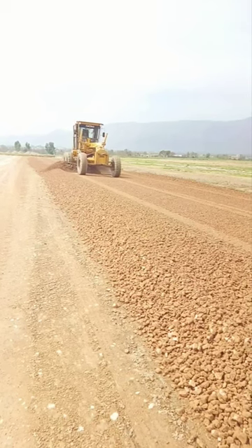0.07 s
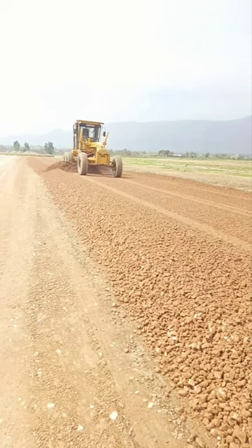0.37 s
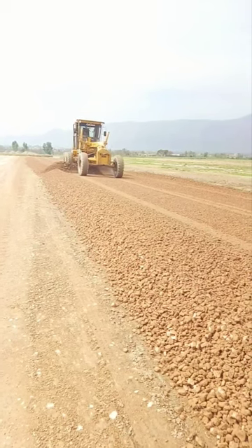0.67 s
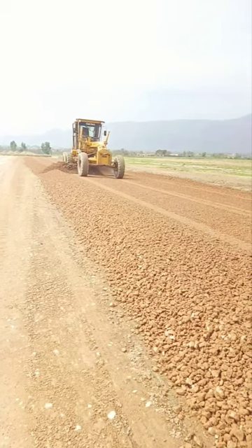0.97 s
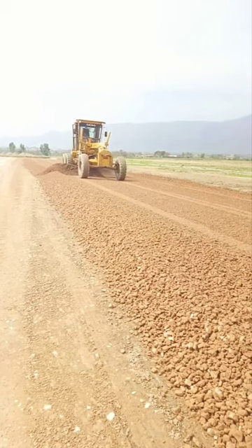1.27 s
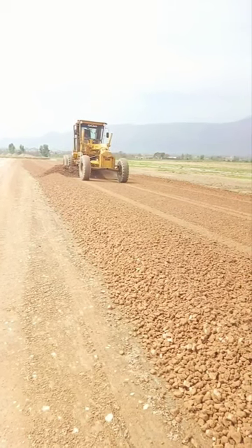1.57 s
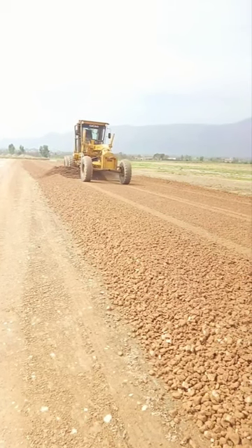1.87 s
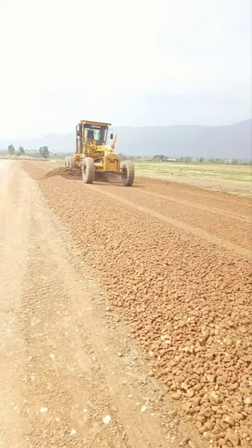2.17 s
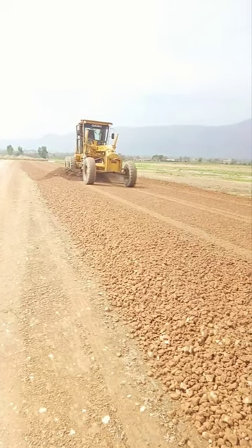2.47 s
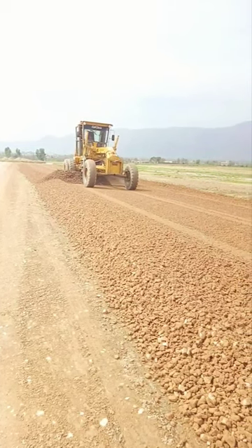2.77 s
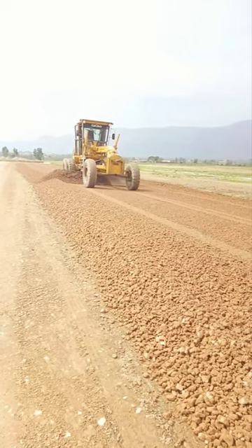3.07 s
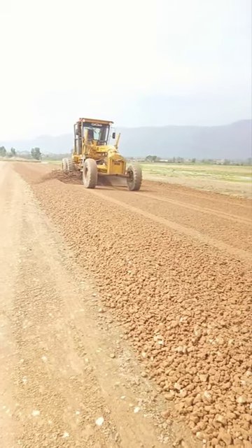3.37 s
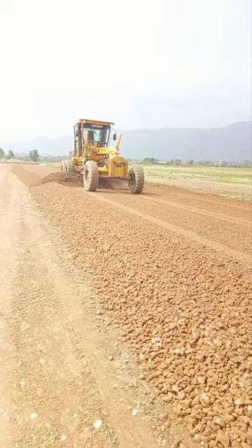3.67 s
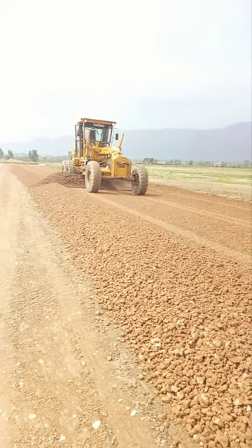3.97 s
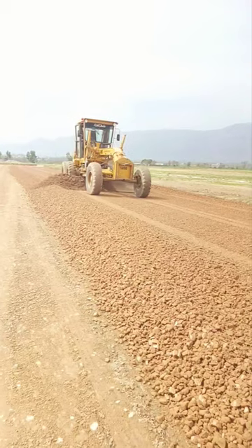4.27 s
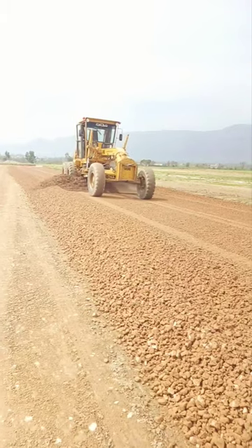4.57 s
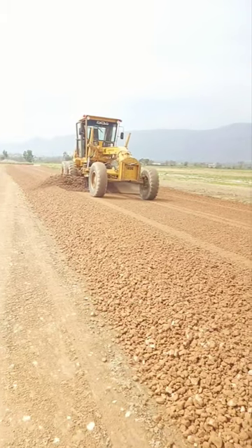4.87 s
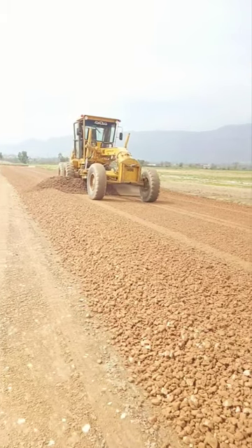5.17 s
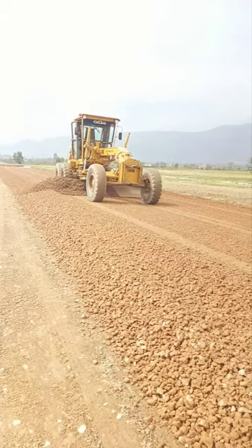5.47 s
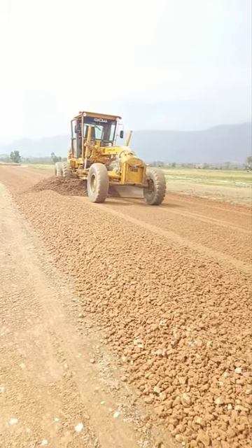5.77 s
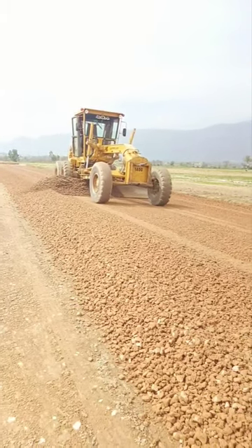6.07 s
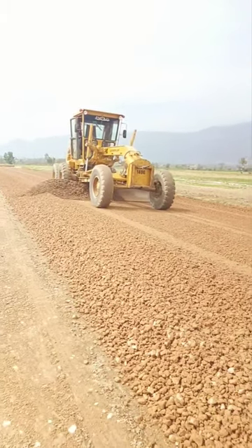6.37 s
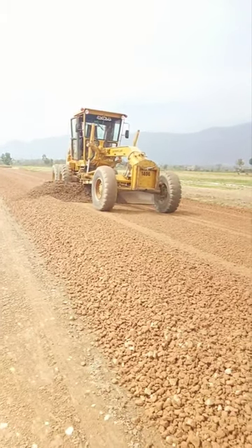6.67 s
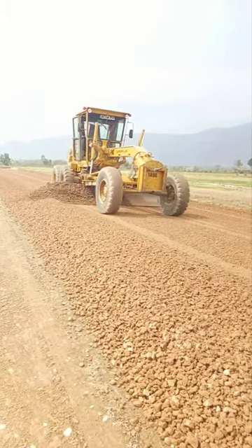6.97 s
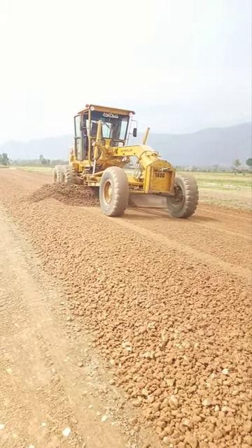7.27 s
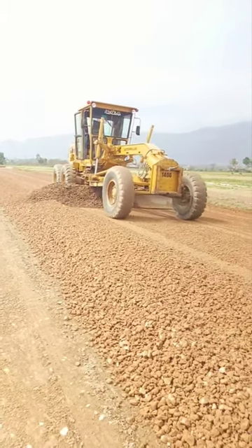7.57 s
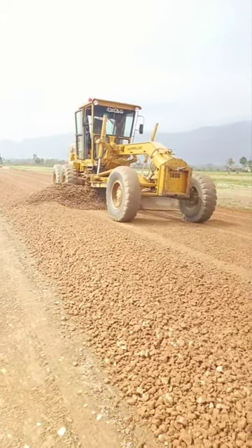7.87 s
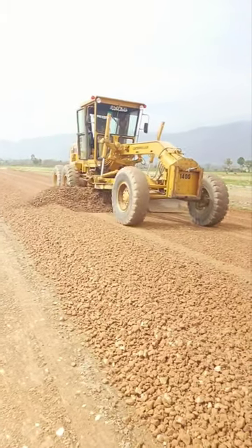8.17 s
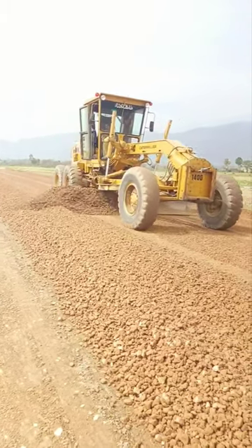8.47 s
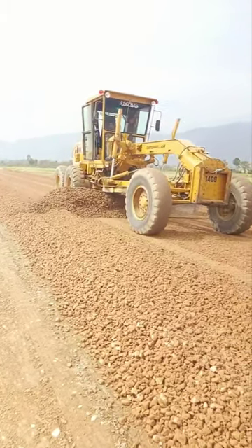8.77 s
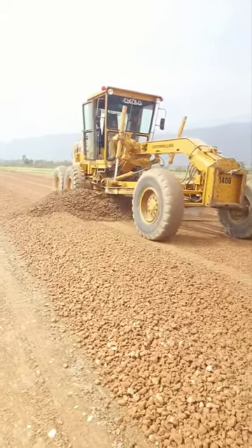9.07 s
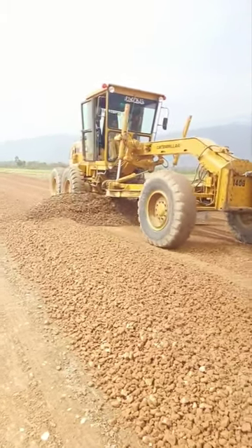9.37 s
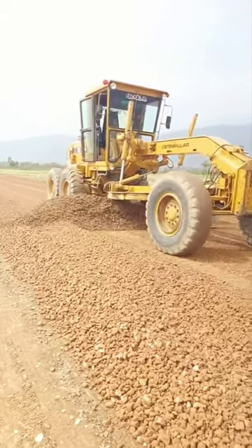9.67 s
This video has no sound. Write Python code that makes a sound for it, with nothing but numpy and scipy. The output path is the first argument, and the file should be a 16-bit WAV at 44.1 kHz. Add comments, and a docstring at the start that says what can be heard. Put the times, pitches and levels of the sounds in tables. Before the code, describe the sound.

Outdoors, gusts of wind rumble on the microphone while a hydraulic valve hisses briefly and shuts. A grader's diesel engine throbs and rattles at an even pace, slowly getting louder as the machine approaches. Its blade pushes a ridge of gravel that hisses, ticks and scrapes, with dull thuds from larger stones later on. Close by, the gear whine stands out above the tyres rumbling over loose ground.

```python
"""On a gravel road in open country, a motor grader creeps closer, its six-cylinder diesel at a steady speed.
The exhaust drones, pistons and firings rattle the engine block, and meshing gears whine.
The blade rolls a ridge of stones that hiss, scrape and thud, while the tyres rumble over loose gravel.
Oil hisses through a hydraulic valve at first, and gusts of wind buffet the microphone."""
import sys
import numpy as np
from scipy import signal
from scipy.fft import rfft, irfft, next_fast_len
from scipy.io import wavfile

SR = 44100
rng = np.random.default_rng(int(sys.argv[2]) if len(sys.argv) > 2 else 0)


def bounce(signal):
    """Save signal as a 16-bit WAV file at the path given by the first command-line argument."""
    frames = np.transpose(np.atleast_2d(signal))
    limited = np.clip(frames, -1, 1)
    pcm = np.round(limited * 32767).astype(np.int16)
    wavfile.write(sys.argv[1], SR, pcm)


N = 433062
T = np.arange(N) / SR
NEAR_M, FAR_M = 10.4, 24  # distances that count as fully near and fully far


def from_db(db):
    """Turn decibels into a factor to multiply a sound by."""
    return 10 ** (np.asarray(db) / 20)


def rms_one(x):
    """Scale a sound so that its average strength (rms) is 1."""
    return x / np.sqrt(np.mean(x ** 2) + 1e-20)


def in_time(rows):
    """Join (time, value) points with straight lines, giving a value for every sample."""
    return np.interp(T, *np.transpose(rows))


def bump(s, half):
    """A smooth rise to 1 and fall around the moment s."""
    return np.exp(-((T - s) / half) ** 2)


def drift(rate_hz):
    """A random wobble of size about 1; a higher rate wobbles faster."""
    step, warm_up = 40, 2000
    r = np.exp(-2 * np.pi * step * rate_hz / SR)
    noise = rng.standard_normal(N // step + warm_up + 2)
    slow = signal.lfilter([1], [1, -2 * r, r * r], noise)[warm_up:]
    return np.interp(np.arange(N) / step, np.arange(len(slow)), rms_one(slow))


def colour(x, spectrum, skirt_db=60):
    """Shape a sound's lows and highs by a spectrum, losing skirt_db per octave beyond its ends."""
    size = next_fast_len(N)
    hz, db = np.transpose(spectrum)
    octave = np.log2(np.maximum(np.arange(size // 2 + 1) * SR / size, 1))
    points = np.log2(hz)
    outside = np.abs(octave - np.clip(octave, points[0], points[-1]))
    gain = from_db(np.interp(octave, points, db) - skirt_db * outside)
    return rms_one(irfft(rfft(x, size) * gain, size)[:N])


def nearing(x, far, near, nearness):
    """Blend from a sound's distant colour (nearness 0) to its close one (nearness 1)."""
    return (1 - nearness) * colour(x, far) + nearness * colour(x, near)


def resonate(x, hz, width):
    """Make a sound ring at one pitch; a narrower width rings longer."""
    r = np.exp(-np.pi * width / SR)
    feedback = [1, -2 * r * np.cos(2 * np.pi * hz / SR), r * r]
    return signal.lfilter(np.array([1, 0, -1]) * (1 - r * r) / 2, feedback, x)


def ringing(x, modes):
    """Ring at several pitches (modes) at once, added with alternating signs."""
    rings = ((-1) ** k * from_db(db) * resonate(x, hz, width) for k, (hz, width, db) in enumerate(modes))
    return rms_one(sum(rings))


def grains(per_s, spread_db, length_s):
    """Tiny hits at random moments, each a dying burst of noise, a few much larger than the rest."""
    sizes = from_db(spread_db * np.minimum(rng.exponential(1, N), 5))
    hits = rng.random(N) < per_s / SR
    power = signal.lfilter([1], [1, -np.exp(-2 / (length_s * SR))], hits * sizes ** 2 + 1e-12)
    return rms_one(np.sqrt(power) * rng.standard_normal(N))


def tone(turns, flutter):
    """A pure tone, one wave per turn, that flutters in the moving air."""
    angle = 2 * np.pi * (turns + rng.random())
    wave = (1 + flutter * drift(2.0)) * np.sin(angle) + flutter * drift(2.03) * np.cos(angle)
    return np.sqrt(2) * wave / np.sqrt(1 + 2 * flutter ** 2)


def doublings(start_m=30, roll_m_per_s=1.9):
    """How many times the approaching grader's distance doubles beyond NEAR_M."""
    return np.log2((start_m - roll_m_per_s * T) / NEAR_M)


def closeness():
    """0 far away, 1 close by."""
    return np.clip(1 - doublings() / np.log2(FAR_M / NEAR_M), 0, 1)


def swell(start_s=1.87, length_s=0.47):
    """Goes from 0 to 1 early on, as the machine grows louder and stays so."""
    return np.clip((T - start_s) / length_s, 0, 1)


def level_of(part):
    """Level in dB of one part of the machine as it comes closer."""
    # part: (level at NEAR_M [dB], loss per doubling of distance [dB], cut before the swell [dB])
    part_levels = {"block": (-36.5, 6, 2.5), "injectors": (-43, 7.5, 2.5), "blade": (-32.5, 10.5, 3),
                   "gravel": (-48, 8.5, 3), "grit": (-61, 5, 4.5), "tyres": (-42, 3, 3),
                   "wheel rumble": (-38.5, 7, -1.5)}
    near_db, loss_db, cut_db = part_levels[part]
    return near_db - loss_db * doublings() - cut_db * (1 - swell())


def exhaust(cycle):
    """The silencer lets the lowest firing tones through; unequal cylinders make them throb."""
    # exhaust tones: (waves per engine cycle [count], relative level [dB])
    orders = {6: 0, 12: -14, 18: -16.5, 21: -28.5, 24: -32.5, 26: -27.5}
    # uneven firing: (time [s], throb depth [0-1])
    throb_depths = [(.65, 0.28), (.9, 0.8), (1.7, 0.3), (1.9, 0.2), (5, 0.44), (9.8, 0.4)]
    # the drone, loudest under load at first, then wavering in the moving air: (time [s], level [dB])
    drone_levels = [(0, -24.5), (.4, -25.5), (.75, -28.5), (.87, -33), (1.02, -31.3), (1.15, -34),
                    (1.72, -33.3), (1.87, -29.8), (3.95, -29.8), (4.2, -32.5), (4.47, -30.8), (4.68, -36),
                    (4.85, -32), (5.08, -35.3), (5.3, -31.5), (5.6, -30.3), (6, -32), (6.15, -29.9),
                    (7.4, -31), (8.5, -30.2), (8.8, -31), (9.35, -29), (9.82, -31.7)]
    drone = sum(from_db(db) * tone(order * cycle, flutter=.1) for order, db in orders.items())
    depth = in_time(throb_depths)
    throb = 1 + depth * np.sin(2 * np.pi * (cycle + 0.41 * drift(3.08)))
    throb /= np.sqrt(1 + depth ** 2 / 2)
    waver_db = .6 * drift(6)
    return from_db(in_time(drone_levels) + waver_db) * rms_one(drone * throb)


def rattle(cycle, repeat, uneven_db, slots=24, size=4096):
    """Metal parts tap unevenly; the share 'repeat' comes round every engine cycle, the rest is random."""
    position = cycle % 1
    one_cycle = irfft(np.exp(2j * np.pi * rng.random(size // 2 + 1)))
    repeating = rms_one(np.interp(position * size, np.arange(size), one_cycle))
    loose = grains(per_s=1700, spread_db=1.5, length_s=0.0072)
    taps = np.sqrt(repeat) * repeating + np.sqrt(1 - repeat) * loose
    strengths = from_db(uneven_db * rng.permutation(np.linspace(-1, 1, slots)))
    return taps * strengths[(position * slots).astype(int)]


def knocks(cycle, uneven_db=4, chance_db=3.5, cylinders=6):
    """Each firing strikes the engine block and makes it ring, some cylinders harder than others."""
    # ringing of the block: (pitch [Hz], width [Hz], relative level [dB])
    block_modes = [(638, 25, -1.5), (679, 17, -3), (974, 28, 1), (1003, 24, 1), (1425, 48, -13.5),
                   (1886, 50, -17), (2620, 70, -20), (2768, 35, -8)]
    firing = (cycle * cylinders).astype(int)
    at = np.flatnonzero(np.diff(firing))
    cylinder_db = uneven_db * rng.permutation(np.linspace(-1, 1, cylinders))[firing[at] % cylinders]
    out = 0
    for hz, width, db in block_modes:
        blows = np.zeros(N)
        blows[at] = from_db(cylinder_db + chance_db * rng.standard_normal(len(at)))
        blows[at] *= rng.choice([-1, 1], len(at))
        out = out + from_db(db) * rms_one(resonate(blows + 1e-18, hz, width))
    return rms_one(out)


def clatter(cycle, swell_share=0.66, shimmer_db=0.75, panels_db=-6, knocks_db=-7):
    """Pistons and valves rattle the block and shake the panels; moving air makes the sound shimmer."""
    # the block from afar, the block close by, and the panels: (frequency [Hz], relative level [dB])
    block_far = [(780, -7), (900, 1.5), (965, -6.5), (1010, 10.5), (1060, 1), (1190, -2.5), (1330, 0),
                 (1430, 0), (1500, 5.5), (1600, -64)]
    block_near = [(780, -7), (850, -10), (910, 2), (980, -8.5), (1090, -4), (1170, -10.5), (1380, -8.5),
                  (1490, -10.5), (1600, -25.5)]
    panel_spectrum = [(480, -10), (560, -5.5), (625, 0.5), (690, 3.5), (760, -12)]
    nearness = swell_share * swell() + (1 - swell_share) * closeness()
    block = nearing(rattle(cycle, repeat=.36, uneven_db=2.3), block_far, block_near, nearness)
    panels = from_db(panels_db) * colour(rattle(cycle, repeat=0.52, uneven_db=3.5), panel_spectrum)
    return from_db(shimmer_db * drift(5.0)) * (block + panels + from_db(knocks_db) * knocks(cycle))


def gears(cycle):
    """Timing gears and the fuel pump hum in step with the engine, clearest midway through."""
    # gear and pump tones: (waves per engine cycle [count], relative level [dB])
    orders = {36: -17, 42.5: -17, 54: -10.5, 55: -15, 59: -18, 72: -17, 77: -17, 84: -13, 85: -12.5, 87:
              -14, 90: -15.5, 93: -19.5, 96: -19.5, 116: -20, 123: -19.5, 127.3: -20, 147: -25, 240: -23.5}
    # how well they stand out of the clatter: (time [s], boost [dB])
    clarity = [(0, -5), (1.8, -5), (2.6, 1), (7, 1.5), (8.5, -2.5)]
    tones = sum(from_db(db) * tone(order * cycle, flutter=0.9) for order, db in orders.items())
    return from_db(in_time(clarity)) * tones


def injectors(cycle):
    """The fuel injectors tick, giving the diesel knock its bright edge."""
    # injector ticking: (frequency [Hz], relative level [dB])
    spectrum = [(1600, 4), (1670, 1), (1765, 6), (1870, 6.5), (2000, 1.5), (2180, 1), (2400, -2.5),
                (2510, 4), (2640, 6), (2780, 6), (2950, 3), (3130, -7.5)]
    return from_db(level_of("injectors")) * colour(rattle(cycle, repeat=0.12, uneven_db=-1.0), spectrum)


def stone_ridge(slump_db=0.46, steel_db=-1.5):
    """Rolling stones drum on the blade, ring its steel and rub together; sand trickles between them."""
    # drumming on the blade, then gravel and sand, far and near: (frequency [Hz], relative level [dB])
    drum_spectrum = [(190, -7.5), (330, -13.5), (442, -6.5), (535, 0.5), (577, -2.5), (692, -3),
                     (779, -11.5), (850, -10), (1100, -56), (1870, -120)]
    gravel_far = [(1820, -24), (3100, -4.5), (3210, -13), (3430, 3.5), (3820, 1.5), (4140, 1.5),
                  (4850, -11), (5200, -5), (5830, -11.5), (6770, -3), (7410, -1), (7730, -3.5), (8280, -21),
                  (8600, -25), (11200, -45), (18900, -120)]
    gravel_near = [(1760, -51), (3000, -18), (3250, 3), (3710, -1), (4060, 2), (5000, -10), (5580, -4),
                   (5980, -14), (6400, -6.5), (7320, -10), (8320, -19), (9000, -11), (11700, -49),
                   (19800, -120)]
    sand_far = [(4820, -41), (8200, -6), (9400, -4), (10400, -6), (11300, -3.5), (14400, -8),
                (15800, -13.5)]
    sand_near = [(4820, -41), (8200, -6), (8500, -23), (9330, -18), (10200, -10), (11100, 2), (12600, 1),
                 (15200, -3), (15800, -12)]
    # ringing of the steel blade: (pitch [Hz], width [Hz], relative level [dB])
    blade_modes = [(1730, 38, 13), (2227, 43, 9), (2810, 64, 2), (3490, 130, -2.5), (4130, 130, 1),
                   (4570, 130, -5), (5120, 150, -9.5), (5580, 170, -4.5), (6350, 290, -5.5),
                   (7130, 240, -11), (9530, 240, -14)]
    tumbling = grains(per_s=1200, spread_db=1.9, length_s=.004)
    rubbing = grains(per_s=1900, spread_db=2.0, length_s=0.0092)
    sliding = grains(per_s=230, spread_db=3.0, length_s=0.014)
    trickling = grains(per_s=8400, spread_db=1.5, length_s=0.0016)
    drum = from_db(level_of("blade")) * colour(tumbling, drum_spectrum)
    crunch = from_db(level_of("gravel")) * nearing(rubbing, gravel_far, gravel_near, closeness())
    steel = from_db(level_of("gravel") + steel_db) * ringing(sliding, blade_modes)
    sand = from_db(level_of("grit")) * nearing(trickling, sand_far, sand_near, closeness())
    return (drum + crunch + steel + sand) * from_db(slump_db * drift(4.4))


def pebbles(per_s=130, spill_db=5.5, range_hz=(3400, 11500), pitches=12, sharpness=14):
    """Pebbles spill off the ridge in little runs and tick at different pitches, louder close by."""
    near_db, loss_per_doubling_db = -58, 11
    rate = per_s * from_db(spill_db * np.tanh(drift(5)))
    ticks = 0
    for hz in np.geomspace(*range_hz, pitches):
        hits = (rng.random(N) < rate / (pitches * SR)) * rng.uniform(.2, 1, N)
        ring = resonate(resonate(hits + 1e-18, hz, hz / sharpness), hz, hz / 2)
        ticks = ticks + rms_one(ring) / hz ** 1.5  # higher ticks are quieter
    return from_db(near_db - loss_per_doubling_db * doublings()) * rms_one(ticks)


def tyres():
    """Stones shift dully under the heavy wheels and the ground rumbles, more so over each heap."""
    # shifting gravel and rumbling ground: (frequency [Hz], relative level [dB])
    gravel_spectrum = [(150, -18), (210, -0.5), (290, 4), (340, -2.5), (400, -17.5)]
    rumble_spectrum = [(85, -8), (102, -4.5), (140, -12.5), (190, -11.5)]
    # heaps (louder) and smooth ground (quieter): (time [s], change [dB], half length [s])
    heaves = [(4.68, -9, .12), (5.123, -9, 0.085), (5.88, 6, 0.11), (6.6, 3, 0.17), (7.07, 6, .06),
              (7.23, 6.5, .06), (8.008, 6, 0.061), (8.25, 2, 0.082), (8.5, 4, 0.051), (8.88, 2, .08),
              (9.264, 8, 0.066)]
    contacts = grains(per_s=400, spread_db=4.5, length_s=0.0048)
    shifting = from_db(level_of("tyres")) * colour(contacts, gravel_spectrum)
    rumble = from_db(level_of("wheel rumble")) * colour(rng.standard_normal(N), rumble_spectrum)
    return (shifting + rumble) * from_db(sum(db * bump(s, half) for s, db, half in heaves))


def hydraulics(release_s, shuts_s=.79):
    """How hard the hydraulics work: at most 1, falling to 0 as the valve shuts."""
    return np.clip((shuts_s - T) / release_s, 0, 1)


def valve(start_db=-50.5, fade_db_per_s=7.5):
    """Oil hisses through a valve and its pipes until the valve snaps shut."""
    # ringing of the pipes: (pitch [Hz], width [Hz], relative level [dB])
    pipe_modes = [(1854, 39, 10.5), (2920, 200, 1), (3600, 220, -3), (4560, 200, -1.5), (5500, 260, -5),
                  (6560, 330, -6.5), (9300, 530, -19)]
    flow = from_db(start_db - fade_db_per_s * T) * hydraulics(release_s=0.011)
    return flow * ringing(rng.standard_normal(N), pipe_modes)


def wind(breeze_db=-35.5, fade_db_per_s=0.46, lumpy_db=6.5):
    """Swirls of air hit the microphone, harder in gusts; sharp puffs carry smaller, higher ones."""
    # gusts and sharp puffs: (time [s], level [dB], half length [s])
    gust_events = [(.16, -28.5, 0.14), (.36, -27.5, .12), (.57, -25.5, 0.13), (.74, -27.5, 0.06),
                   (1.9, -35.5, 0.08), (2.26, -31.5, .09), (2.44, -28.5, .12), (2.8, -32, 0.13),
                   (3.2, -34.5, 0.15), (3.58, -34.5, .1), (3.87, -34, 0.12), (4.28, -29, 0.087),
                   (4.5, -36, .05), (4.87, -38, .06), (5.34, -32.5, .12), (5.64, -28, 0.09),
                   (5.76, -30, .04), (5.93, -33.5, .1), (6.16, -32.5, 0.08), (6.57, -32, 0.17),
                   (7.2, -37, 0.1)]
    puff_events = [(0.474, -35, 0.015), (0.575, -33, 0.023), (0.73, -45, 0.052), (5.27, -32, 0.018),
                   (5.36, -28.5, 0.032), (5.628, -36, 0.046)]
    # deep wind rumble and the higher puffs: (frequency [Hz], relative level [dB])
    wind_spectrum = [(15, -11), (32, -10), (52, -2), (85, 1), (115, 2), (140, -0.5), (190, -5), (240, -9),
                     (290, -11), (350, -19.5), (450, -33), (900, -60)]
    puff_spectrum = [(150, 6), (250, 7), (350, -0.5), (480, -5.5)]
    swirls = rng.standard_normal(N) * from_db(lumpy_db * np.tanh(drift(42)))
    breeze = from_db(breeze_db - fade_db_per_s * T)
    gusts = sum(from_db(db) * bump(s, half) for s, db, half in gust_events)
    puffs = sum(from_db(db) * bump(s, half) for s, db, half in puff_events)
    rumble = np.hypot(breeze, gusts) * colour(swirls, wind_spectrum)
    return rumble + puffs * colour(rng.standard_normal(N), puff_spectrum)


def low_whine(cycle, waves_per_cycle=47.15):
    """Meshing teeth in the drive make a firm tone, faint at first, that sings out late."""
    # the lower whine: (time [s], level [dB])
    levels = [(.2, -52), (.7, -61), (3.5, -53), (5, -57), (7.8, -50), (8.4, -37.5), (9.1, -41),
              (9.65, -34.5)]
    return from_db(in_time(levels)) * tone(waves_per_cycle * cycle, flutter=.2)


def high_whine(cycle, waves_per_cycle=80.05, surge_depth=0.094):
    """Other drive gears howl in their housing, surging once a cycle, louder and rougher close by."""
    # the higher whine: (time [s], level [dB])
    levels = [(0, -66), (1.8, -52), (2.3, -52), (4.4, -44.5), (7.2, -42), (7.9, -38.5), (8.8, -40),
              (9.5, -38.5), (9.82, -42)]
    # ringing of the gear housing: (pitch [Hz], width [Hz], relative level [dB])
    housing_modes = [(925, 55, -2), (1005, 60, -4.5)]
    howl = 0
    for hz, width, db in housing_modes:
        ring = resonate(resonate(rng.standard_normal(N), hz, width), hz, width)
        howl = howl + from_db(db) * rms_one(ring)
    sag = 1 - .03 * bump(s=9.24, half=.08)  # the pitch dips once as the blade bites
    turns = waves_per_cycle * np.cumsum(np.gradient(cycle) * sag)
    roughness = (.085 + .045 * closeness()) * drift(16)
    teeth = tone(turns + roughness, flutter=.3) * from_db(2.7 * drift(14))
    surge = 1 + surge_depth * np.sin(2 * np.pi * cycle)
    return from_db(in_time(levels)) * rms_one((howl + teeth) * surge)


def scrapes(rise_share=0.17):
    """A larger stone grinds briefly and rings; the longer the scrape, the softer its start."""
    # scraping stones: (time [s], peak level [dB], pitch [Hz], width [Hz], fade time [s])
    stones = [(0.235, -39.5, 1830, 398, 0.044), (0.262, -43, 1880, 300, 0.077),
              (0.525, -55, 9000, 2980, .02), (0.912, -48, 5370, 700, 0.007), (1.105, -46, 1900, 600, .012),
              (1.976, -31, 477, 200, 0.0063), (2.2, -40, 2180, 900, 0.024), (3.454, -41, 1800, 700, .012),
              (4.187, -34, 1740, 600, 0.024), (4.528, -47, 6500, 3000, 0.023),
              (5.05, -44, 4130, 400, 0.024), (6.733, -40, 4150, 700, 0.012), (7.04, -46, 4130, 400, 0.017),
              (7.69, -45, 4100, 400, .018), (8.319, -42, 4160, 1200, .006), (9.027, -40, 2000, 700, .015),
              (8.777, -51, 9000, 4000, .02), (8.85, -42, 6900, 900, .006), (8.968, -46, 7950, 3040, .005),
              (9.267, -43, 11300, 2000, .003), (9.613, -46, 7000, 2000, .005),
              (9.705, -45, 7500, 4960, .025), (9.758, -40, 4150, 1200, .02)]
    out, t = np.zeros(N + SR), T[:SR // 2]
    for s, db, hz, width, fade_s in stones:
        envelope = np.exp(-t / fade_s) * (1 - np.exp(-t / (rise_share * fade_s)))
        grinding = rng.standard_normal(len(t)) * envelope
        ring = resonate(resonate(grinding, hz, width), hz, 2 * width)
        at = int(s * SR)
        out[at:at + len(t)] += from_db(db) * ring / np.abs(ring).max()
    return out[:N]


def thuds():
    """A heavy stone hits the blade, which is loaded with earth and so rings only briefly."""
    # heavy stones: (time [s], peak level [dB], pitch [Hz], width [Hz])
    hits = [(3.284, -28, 950, 150), (5.193, -26.5, 900, 280), (6.924, -20, 600, 190),
            (7.651, -18.5, 620, 280), (7.845, -21, 570, 240), (7.993, -24, 540, 200),
            (8.415, -26, 550, 200), (9.268, -18, 600, 300), (9.318, -16, 600, 140)]
    out, blow = np.zeros(N + SR), signal.unit_impulse(SR // 10)
    for s, db, hz, width in hits:
        ring = resonate(resonate(blow, hz, width), hz, width)
        at = int(s * SR)
        out[at:at + len(ring)] += from_db(db) * ring / np.abs(ring).max()
    return out[:N]


def scene():
    """Add up engine, ground, valve and wind; one turning crankshaft times all the engine sounds."""
    # engine speed: (time [s], firings [per s])
    speed = [(0, 69.6), (.5, 69.8), (1, 69.6), (1.8, 69.5), (2.3, 69.27), (3, 69.12), (4, 69.2), (6, 69.22),
             (7, 69.13), (9.82, 69.08)]
    firing_hz = in_time(speed) * (1 + .001 * drift(3))
    cycle = np.cumsum(firing_hz) / (6 * SR)  # engine cycles so far, six firings each
    load_db = 4.5 * hydraulics(release_s=0.86)  # the block is louder while it drives the hydraulics
    block = from_db(level_of("block") + load_db) * (clatter(cycle) + gears(cycle))
    engine = block + injectors(cycle)
    ground = stone_ridge() + pebbles() + scrapes() + thuds() + tyres()
    machine = engine + exhaust(cycle) + low_whine(cycle) + high_whine(cycle) + valve()
    return (machine + ground + wind())[None]


def record(dry, cutoff_hz=15800):
    """A steep filter removes the very highest treble."""
    return signal.sosfilt(signal.ellip(12, .1, 90, cutoff_hz, fs=SR, output="sos"), dry)


dry = scene()
out = record(dry)
bounce(out)
```